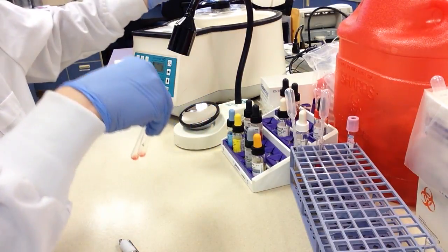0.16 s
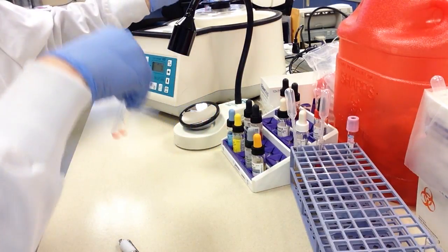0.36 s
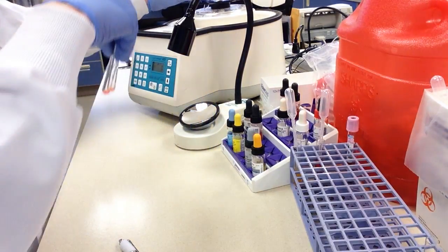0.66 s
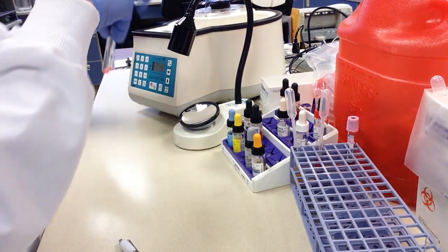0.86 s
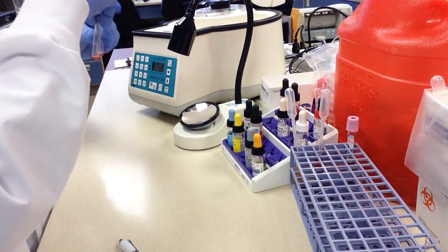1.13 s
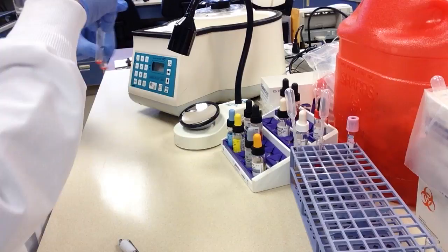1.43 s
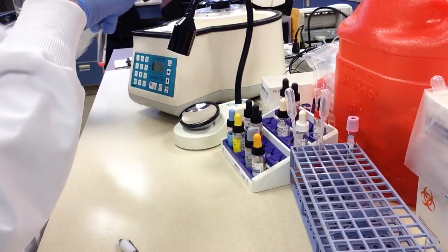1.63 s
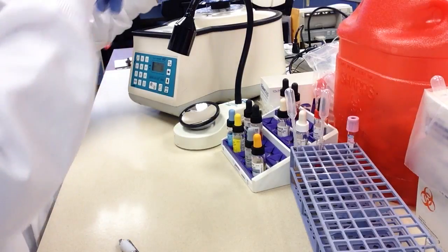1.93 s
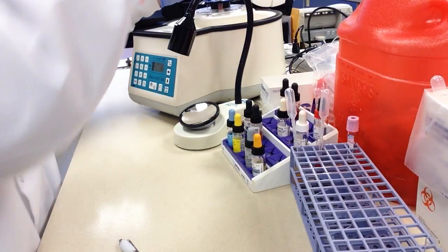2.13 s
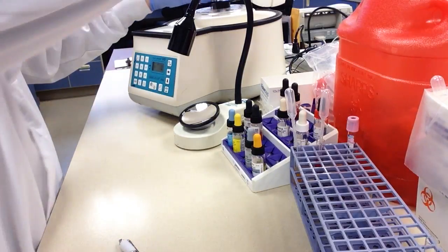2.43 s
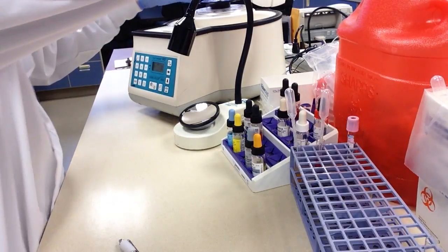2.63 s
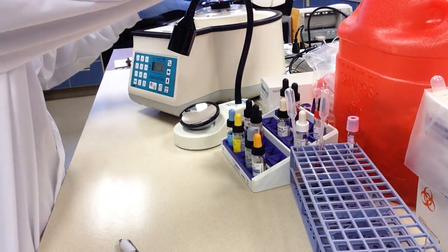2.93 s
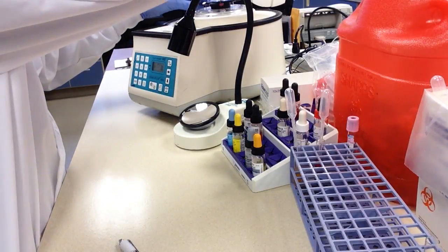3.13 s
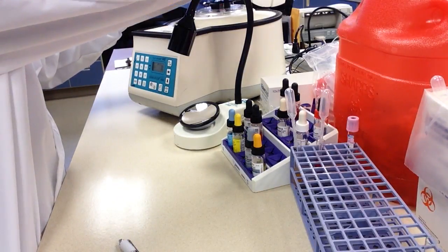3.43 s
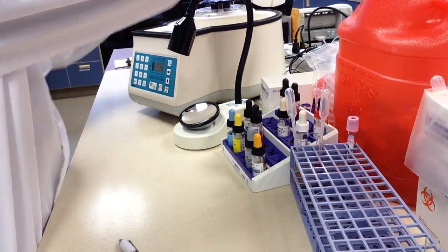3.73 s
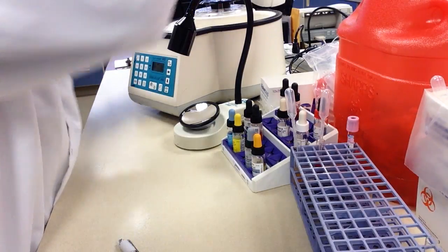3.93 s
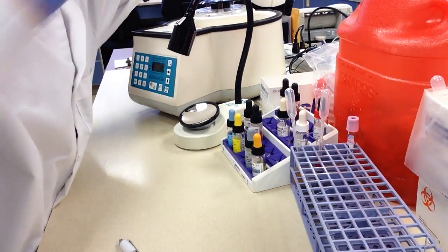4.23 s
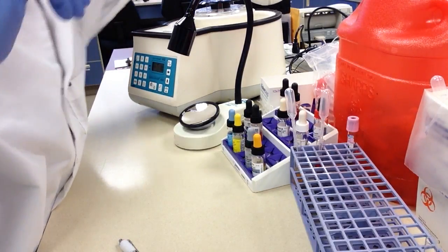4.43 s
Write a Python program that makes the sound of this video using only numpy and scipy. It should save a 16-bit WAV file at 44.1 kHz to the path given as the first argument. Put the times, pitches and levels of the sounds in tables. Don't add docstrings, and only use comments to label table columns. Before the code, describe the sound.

Crisp glass taps come first, then a lull of faint air noise and low hum. A second cluster of knocks and ringing clinks leads to the loudest event, a dropped tube rattling to rest. A sleeve rustles, small taps return, and a hollow lid is knocked. Heard from roughly a step away, with a short bright room tail.

```python
import sys
import numpy as np
from scipy import signal
from scipy.fft import rfft, irfft
from scipy.io import wavfile
from scipy.ndimage import uniform_filter1d

SR = 44100
rng = np.random.default_rng(int(sys.argv[2]) if len(sys.argv) > 2 else 0)


def voltage_ratio(decibels):
    exponent = np.asarray(decibels, float) / 20
    return 10 ** exponent


def put_to_file(sound):
    columns = np.atleast_2d(sound).T
    safe = np.clip(columns, -1, 1)
    whole_steps = np.round(safe * 32767)
    wavfile.write(sys.argv[1], SR, whole_steps.astype(np.int16))


N = 201986

# frequency in Hz, density in dB per Hz.
AIR_SPECTRUM = [(40, -28), (100, -15), (140, -2), (250, -4), (700, -16), (2000, -27), (4000, -30.5),
                (16000, -32)]
AIR_DB = -59.5
STIR_DB, STIR_PER_DB = -0.1, 0.09
# frequency in Hz, width in Hz, level in dB.
HUM_TONES = [(119.5, 6.9, -85.5), (234.3, 6.6, -67), (310.6, 14, -73.5), (510, 8.8, -80), (622, 6.4, -75.5)]
# time in seconds, pitch in Hz, level in dB.
COMPRESSOR_PATH = [(0, 140, -76), (.8, 143, -66), (1.25, 140.2, -75), (2.1, 141, -70.5), (2.41, 143.3, -57),
                   (2.7, 145.3, -62), (3.37, 149.1, -59.5), (4.11, 155.2, -67.5), (4.58, 153.6, -69)]
# time in seconds, rustle level in dB.
RUSTLE_PATH = [(0, -68.5), (.35, -77), (.65, -68), (1.2, -73.5), (1.9, -71.5), (2.17, -67.5), (2.47, -60.5),
               (2.6, -63), (2.97, -71.5), (3.6, -71.5), (3.94, -62.5), (4.16, -62.5), (4.36, -66.5),
               (4.58, -67.5)]
# frequency in Hz, density in dB per Hz.
CLOTH_SPECTRUM = [(150, -38), (400, -1.5), (1500, -1), (4000, -5), (8000, -8), (15200, -11), (15500, -39)]
# centre in seconds, length in seconds, level in dB.
BRUSHES = [
    (0.052, 0.025, -63.5),
    (1.473, 0.06, -76),
    (1.55, .02, -69),
    (4.36, 0.003, -71),
    (4.578, 0.006, -53),
]
# frequency in Hz, density in dB per Hz.
BRUSH_SPECTRUM = [(1500, 1.5), (3500, -7), (5000, 0.5), (7000, -6), (15000, -3.5), (15500, -35)]
# start in seconds, level in dB, centre in Hz.
THUMPS = [(0.478, -76, 352), (0.639, -44, 515), (0.724, -55, 890), (0.769, -42.5, 370), (0.799, -54, 336),
          (2.117, -47.5, 517), (2.374, -47.5, 816), (2.554, -49, 435), (3.322, -48, 740),
          (4.306, -48.5, 298), (4.399, -58.5, 378), (4.438, -58, 400)]
# frequency in Hz, level in dB, T60 in seconds.
KNOCK_MODES = [(256.5, 5, 0.38), (209.5, -17, 0.042), (364, -10, 0.082), (435, -7, 0.055),
               (620, -23, 0.063), (701, -12, 0.11)]
KNOCK_S, KNOCK_DB = 4.506, -41.5
# start in seconds, level near 13.6 kHz in dB, level near 8.7 kHz in dB.
GLINTS = [(0.378, -68, -49.5), (0.4863, -62, -42), (2.111, -73, -51.5), (2.378, -57, -70),
          (2.6179, -56, -63), (3.323, -65, -53), (3.701, -50, -34), (3.7519, -66, -52), (3.7828, -62, -46),
          (3.8064, -61, -55), (3.8242, -56, -61), (3.8534, -62, -69), (4.4874, -63, -79),
          (4.5294, -76, -77)]
# frequency in Hz, level in dB, T60 in seconds.
GLINT_MODES = [(13600, -7, 0.09), (13480, -7, .08), (8760, -3, 0.022), (9000, -4, .018)]

# edges between them, then their centres, in Hz.
FAMILY_EDGES_HZ = [1400, 1980, 2950, 4250]
FAMILY_HZ = [1100, 1700, 2400, 3600, 5500]
# frequency in Hz, T60 in seconds, then edge tap, foot tap,
# slot tap, clink, drop in dB.
GLASS_MODES = [(532, 0.15, 0, 3, -8.5, -6, -45), (1025, 0.027, 10, 17, -26, -6, -12),
               (1102, 0.1, -4, -5, 1.5, -2.5, -39), (1163, 0.18, 3, -20, -15, -8, 8.5),
               (1560, 0.018, -33, -17, 9, -24, -7), (1710, 0.077, -1, 6, 5.5, -2.5, 8),
               (1749.5, 0.13, -5, -0.5, -17, -5, -5), (1890, 0.016, -2, -14, -11, -27, -9),
               (2054, 0.049, -18, -8, -21, -25, -3),
               (2240, 0.04, -27, -24, -25, -17, 1), (2141, 0.082, -0.5, -2, 7.5, -7, -2.5),
              (2270, 0.049, -14, -5, -4, -3.5, -27), (2578, 0.062, 4, -6, 0.5, 0, 4.5),
              (2640, 0.048, -9, -21, -22, -21, -2), (2664, 0.16, -6, -6.5, -45, 0.5, -21),
              (2748, 0.056, 2.5, 2.5, -6, 2.5, -22), (3207, 0.085, -3, -15, -21, -10, -17),
              (3287, .07, -3, -16, -9, -4.5, -15), (3350, 0.11, -1.5, -3, -9, -9.5, -9),
              (3460, 0.077, -15, -3, -24, -3.5, -9), (3702, 0.06, 1, -1, 5, -2.5, -1),
              (3840, 0.098, 3.5, -8, 0, -7, 3.5), (3880, 0.11, 4, -7, -2, -10, .5),
               (4170, 0.023, 5, -12, .5, 5, -22), (4384, 0.035, 8.5, 0, 4, 6.5, 8.5),
               (4572, 0.073, -4, -0.5, -1.5, 4.5, 1.5), (4623, 0.062, 1, -5, 3, 4.5, 2),
               (5250, 0.051, -11, -5, -26, -3.5, -1), (5770, 0.039, -7, -8, -11, -8, 5),
               (6555, .038, -11, -31, -15, -5, 1), (11500, 0.04, -15, -22, -14, -14, -6)]
# push in seconds, crack in dB, crack decay in seconds, ring length share,
# crack at 15 kHz over the top family in dB, 1.1 kHz family over the blow in dB.
TOUCH = [
    (0.002, 10.5, 0.0019, 0.58, -11, -15),
    (0.0015, 11, 0.0016, 0.8, -12, -2),
    (0.0033, 4.5, .0021, 0.57, -20, -2.5),
    (0.001, 4, 0.0012, 0.67, -6, -8.5),
    (0.003, 8, 0.0015, 0.45, -12, -19),
]
# start in seconds, blow near 1.7 kHz, 2.4 kHz, 3.6 kHz, top family in dB.
EDGE_TAPS = [(0.378, -40, -44, -49, -52.5), (0.6615, -44, -49, -63, -54), (2.6227, -50, -73, -60, -53),
             (2.871, -49, -52, -53.5, -55), (4.402, -51, -64, -67, -76), (4.4338, -61, -60, -70, -76),
             (4.4872, -54, -61.5, -62, -55), (4.527, -55, -65, -65, -59), (4.5452, -52, -64, -80, -65)]
# start in seconds, blow, 2.4 kHz, 3.6 kHz, top family in dB.
FOOT_TAPS = [
    (0.4865, -46, -32.5, -43.5, -38.5),
    (0.625, -64, -77, -72, -79),
]
# start in seconds, blow, 2.4 kHz, 3.6 kHz, top family in dB.
SLOT_TAPS = [
    (2.111, -38.5, -41.5, -52, -46.5),
    (2.5474, -41.5, -34, -49, -44.5),
    (3.068, -50.5, -67, -78, -61),
    (3.389, -59.5, -52.5, -57, -70),
]
# start in seconds, blow, 2.4 kHz, 3.6 kHz, top family in dB.
CLINKS = [(1.122, -72, -70, -66, -83), (1.558, -83, -92, -83, -65), (2.367, -46, -43, -45, -42.5),
          (2.3796, -36, -39.5, -33.5, -24.5), (3.2687, -59, -62, -60, -68), (3.2969, -48.5, -52, -48, -44),
          (3.324, -47.5, -48.5, -34, -47.5), (3.482, -54, -59, -45, -44), (3.657, -81, -73, -69, -66)]
# start in seconds, blow in dB, treble change in dB.
BOUNCES = [
    (3.703, -19, -2),
    (3.7533, -23, -3.5),
    (3.7856, -27.5, -2.5),
    (3.8068, -31.5, -2),
    (3.8235, -32.5, -3),
    (3.8365, -46.5, 7),
    (3.8526, -36, -11),
    (3.863, -60, -3),
]
# 2.4 kHz, 3.6 kHz, top in dB.
DROP_DB = [5, -4.5, -5]
# frequency in Hz, T60 in seconds, tap in dB, clink in dB.
NARROW_MODES = [(1082, 0.068, -4, 0), (1186, 0.044, -14, -2), (1758, 0.16, 2, 2.5),
                (1900, 0.038, -4, -20.5), (2133, 0.079, 0.5, -10), (2273, 0.035, -6, -5),
                (2620, 0.07, -4.5, 1), (2880, 0.065, -3.5, -10), (3280, 0.062, 8, 4.5),
                (3800, 0.11, 1, -13), (3870, 0.098, 5, -0.5), (4520, 0.057, 9, 2), (5300, .04, 1, -7),
                (6070, .05, -3, 1)]
# push in seconds, crack in dB, crack decay in seconds, ring length share,
# crack at 15 kHz over the top family in dB, 1.1 kHz family over the blow in dB.
NARROW_TOUCH = [
    (0.00066, 15.1, 0.0047, 0.52, -24, -15.5),
    (0.0023, 14.3, 0.0021, 0.84, -11, 0),
]
# start in seconds, blow, 2.4 kHz, 3.6 kHz, top family in dB.
NARROW_TAPS = [
    (0.7219, -33.5, -33, -51, -50),
]
# start in seconds, blow, 2.4 kHz, 3.6 kHz, top family in dB.
NARROW_CLINKS = [
    (2.2962, -48, -39, -41.5, -46.5),
    (2.3245, -63, -47.5, -54, -54),
]

# frequency in Hz, T60 in seconds, level in dB.
ROOM_T60 = [(298, 0.088, -2.5), (1130, 0.33, 2), (1660, 0.36, -1.5), (2600, 0.31, 0.5), (4600, 0.35, -7),
            (6640, 0.16, 3), (12000, 0.19, -4)]
ROOM_DB = -9
# delay in seconds, gain.
ECHOES = [(.002732, .5), (.005317, .55), (.009286, .55)]
# frequency in Hz, gain in dB.
MIC_RESPONSE = [(30, -14), (55, -6), (110, 0), (15250, .5), (15480, -20), (16300, -38), (17000, -60)]


def level(x, db):
    return x * voltage_ratio(db) / np.sqrt(np.mean(x ** 2))


def curve(rows):
    return np.interp(np.arange(N) / SR, *np.transpose(rows))


def coloured(x, points):
    hz, db = np.transpose(points)
    log_f = np.log(np.fft.rfftfreq(len(x), 1 / SR) + 1)
    return irfft(rfft(x) * voltage_ratio(np.interp(log_f, np.log(hz), db)), len(x))


def narrow(hz, width_hz):
    f = np.fft.rfftfreq(N, 1 / SR)
    resonance = (1 + 2j * (f - hz) / width_hz) ** 2
    return level(irfft(rfft(rng.standard_normal(N)) / resonance, N), 0)


def walk(rate_hz):
    hold = int(SR / rate_hz)
    steps = np.repeat(rng.standard_normal(N // hold + 1), hold)
    return uniform_filter1d(uniform_filter1d(steps, hold), hold)[:N]


def add(out, s, sound):
    at = int(s * SR)
    out[at:at + len(sound)] += sound[:len(out) - at]


def ring(modes, extra_db, rise_s, detune):
    hz, db, t60 = np.transpose(modes)[:, :, None]
    pitch_chance, phase_chance = rng.standard_normal((2, len(modes), 1))
    t = np.arange(SR // 3) / SR
    turn = 2 * np.pi * hz * (1 + detune * pitch_chance) * t
    decay = np.exp(-np.log(1000) * t / t60)
    tones = voltage_ratio(db + extra_db) * decay * np.sin(turn + 0.7 * phase_chance)
    return tones.sum(axis=0) * (1 - np.exp(-t / rise_s))


def laboratory():
    air = level(coloured(rng.standard_normal(N), AIR_SPECTRUM), AIR_DB)
    swell_db = STIR_DB + STIR_PER_DB * (curve(RUSTLE_PATH) + 70) + 1.4 * walk(6.6)
    hum = sum(voltage_ratio(db) * narrow(hz, width_hz) for hz, width_hz, db in HUM_TONES)
    return voltage_ratio(swell_db) * air + hum


def compressor():
    s, hz, db = np.transpose(COMPRESSOR_PATH)
    pitch_hz = curve(np.c_[s, hz]) + 2.34 * walk(12)
    turn = 2 * np.pi * np.cumsum(pitch_hz) / SR
    return 2 ** 0.5 * voltage_ratio(curve(np.c_[s, db]) + 1.5 * walk(13)) * np.sin(turn)


def sleeve():
    t = np.arange(N) / SR
    hiss_db = -72.5
    rub = np.sqrt(np.maximum(voltage_ratio(2 * curve(RUSTLE_PATH)) - voltage_ratio(2 * hiss_db), 0))
    brushes = sum(voltage_ratio(db) * np.exp(-((t - s) / length_s) ** 2) for s, length_s, db in BRUSHES)
    cloth = rub * level(coloured(rng.standard_normal(N), CLOTH_SPECTRUM), 1.0)
    cloth += brushes * level(coloured(rng.standard_normal(N), BRUSH_SPECTRUM), 0)
    return cloth * voltage_ratio(1.3 * walk(60))


def hand():
    out = np.zeros(N)
    t = np.arange(SR // 8) / SR
    envelope = np.exp(-t / 0.015) * (1 - np.exp(-t / 0.0024))
    for s, db, hz in THUMPS:
        band = [(hz / 3, -30), (hz / 1.8, -3), (hz, 0), (hz * 1.9, -3), (hz * 4, -25)]
        body = coloured(rng.standard_normal(len(t)), band)
        add(out, s, level(body, db - 10) * envelope)
    add(out, KNOCK_S, ring(KNOCK_MODES, KNOCK_DB, rise_s=0.003, detune=0))
    return out


def glints():
    out = np.zeros(N)
    for s, top_db, low_db in GLINTS:
        mode_db = np.array([[top_db], [top_db], [low_db], [low_db]])
        add(out, s, ring(GLINT_MODES, mode_db, rise_s=0.00034, detune=0.0047))
    return out


def tubes(blows, table, touch, kind):
    out = np.zeros(N)
    table = np.array(table)
    family = np.searchsorted(FAMILY_EDGES_HZ, table[:, 0])
    rise_s, crack_db, crack_s, ring_share, top_db, low_db = touch[kind]
    modes = np.transpose([table[:, 0], table[:, 2 + kind], ring_share * table[:, 1]])
    t = np.arange(SR // 3) / SR
    spray = np.exp(-t / crack_s) + 0.093 * np.exp(-t / 0.031)
    lead = 400
    for s, blow_db, *upper_db in blows:
        first_db = blow_db + low_db
        family_db = np.array([first_db, blow_db, *upper_db])
        sound = ring(modes, family_db[family][:, None], rise_s, detune=0.0015)
        colour = [(300, first_db - 50), (700, first_db - 15),
                  *zip(FAMILY_HZ, family_db - [-2.5, 4, 3.0, -1.5, 2]),
                  (9000, family_db[-1] - 7.5), (15000, family_db[-1] + top_db)]
        burst = np.roll(rng.standard_normal(len(t)) * spray, lead)
        crack = np.roll(coloured(burst, colour), -lead) * (t < 0.1)
        add(out, s - 0.001, sound + voltage_ratio(crack_db) * crack)
    return out


def glass():
    mid_db, high_db, top_db = DROP_DB
    drop = [(s, db, db + mid_db, db + high_db + dull_db, db + top_db + dull_db) for s, db, dull_db in BOUNCES]
    wide_modes = GLASS_MODES
    out = np.zeros(N)
    for kind, blows in enumerate([EDGE_TAPS, FOOT_TAPS, SLOT_TAPS, CLINKS, drop]):
        out += tubes(blows, wide_modes, TOUCH, kind)
    for kind, blows in enumerate([NARROW_TAPS, NARROW_CLINKS]):
        out += tubes(blows, NARROW_MODES, NARROW_TOUCH, kind)
    return out


def room(x):
    t = np.arange(int(0.8 * SR)) / SR
    hz, t60, db = np.transpose(ROOM_T60)
    tail = 0
    for centre in 150 * 2 ** np.arange(0, 7, 0.5):
        band = [(centre / 2 ** 0.5, -40), (centre / 1.2, -3), (centre, 0),
                (centre * 1.2, -3), (centre * 2 ** 0.5, -40)]
        noise = coloured(rng.standard_normal(len(t)), band)
        band_t60 = np.interp(np.log(centre), np.log(hz), t60)
        tail = tail + noise * np.exp(-np.log(1000) * t / band_t60)
    tail = coloured(tail, np.c_[hz, db]) * (1 - np.exp(-(t / 0.012) ** 2))
    echoes = np.zeros(len(t))
    for s, gain in ECHOES:
        echoes[int(s * SR)] = gain
    response = voltage_ratio(ROOM_DB) * tail / np.sqrt(np.sum(tail ** 2))
    response += coloured(echoes, [(3000, 2.5), (5000, -10.5), (12000, -1.5)])
    response[0] = 1
    return signal.fftconvolve(x, response * (t < 0.7))[:N]


def scene():
    background = laboratory() + compressor() + sleeve()
    struck = voltage_ratio(-3.5) * glass() + glints() + hand()
    return (background + room(struck))[None]


def band_limit(x):
    return signal.sosfilt(signal.butter(12, 16450, fs=SR, output="sos"), x)


def record(dry):
    mix = coloured(dry[0], MIC_RESPONSE)[None]
    return band_limit(mix)


dry = scene()
out = record(dry)
put_to_file(out)
```